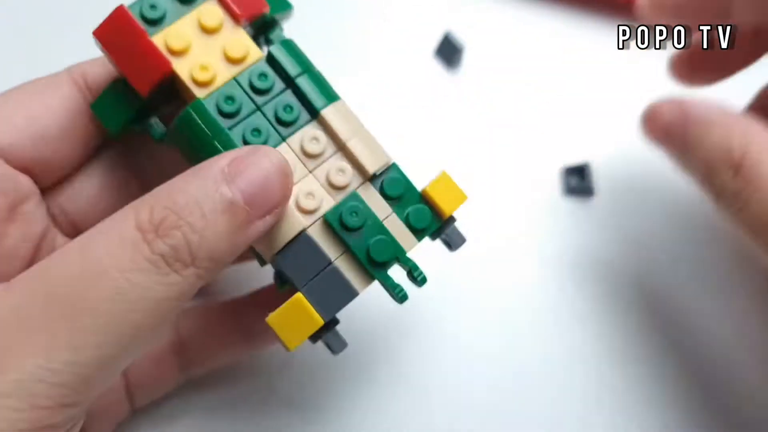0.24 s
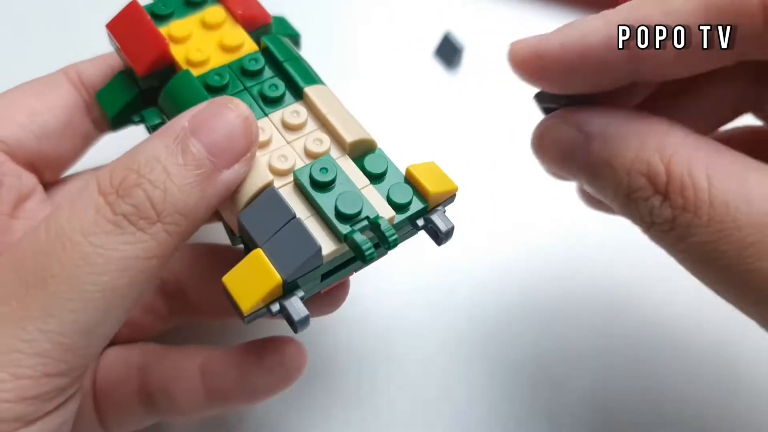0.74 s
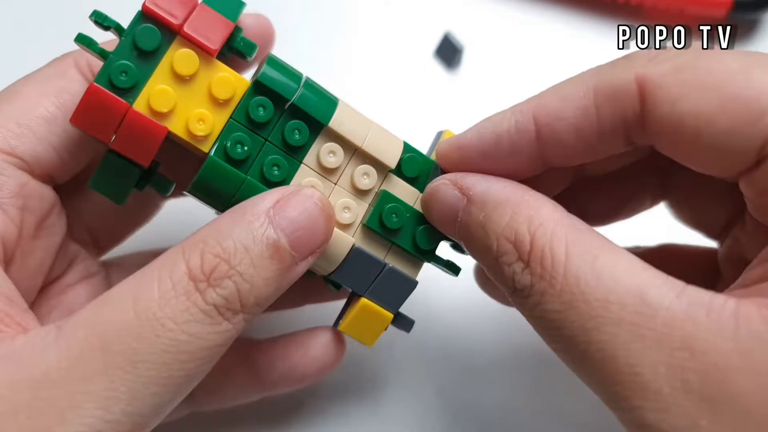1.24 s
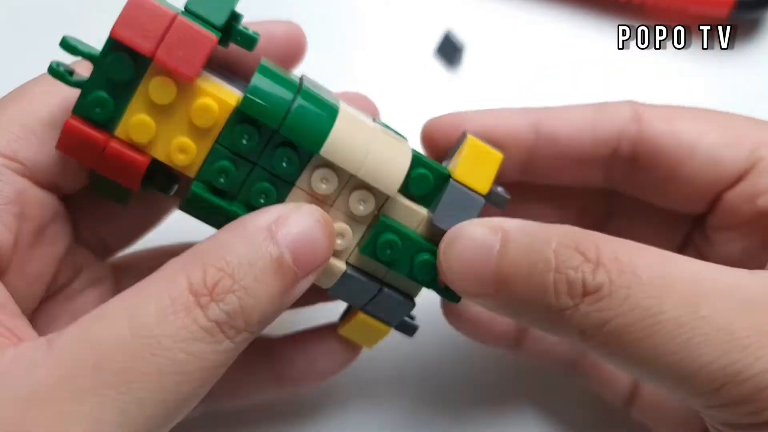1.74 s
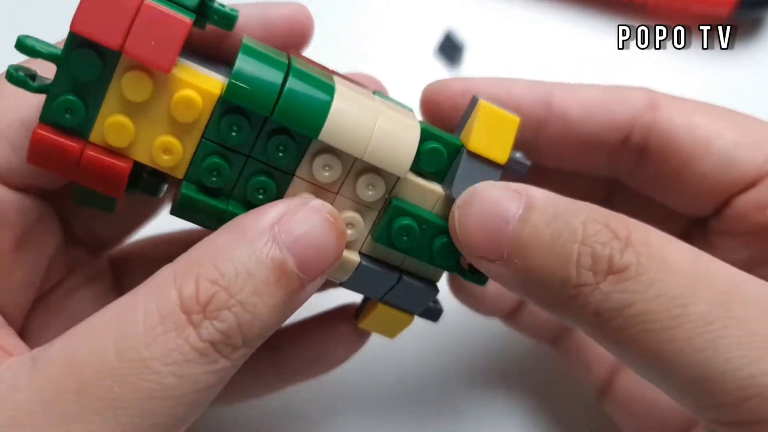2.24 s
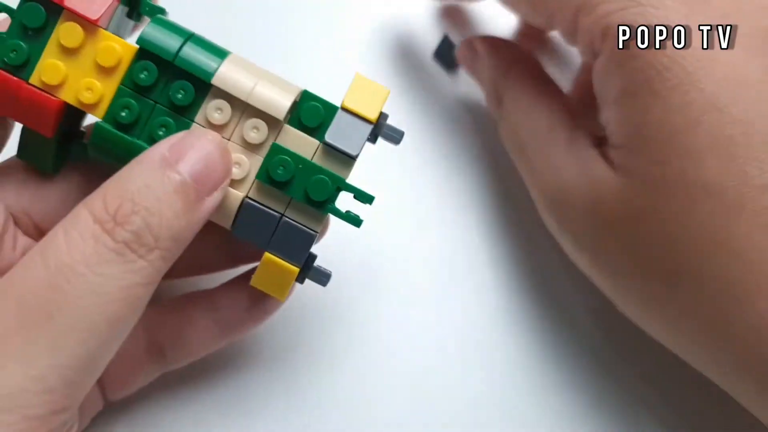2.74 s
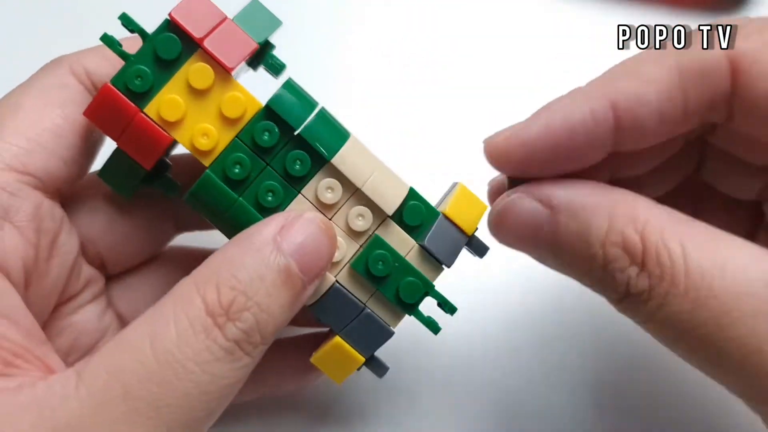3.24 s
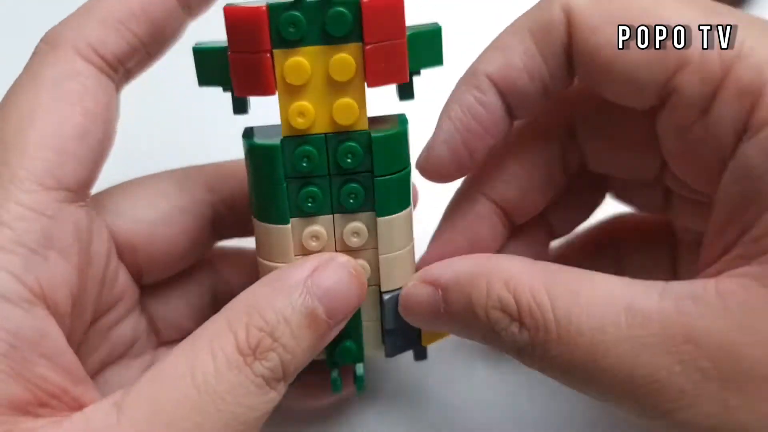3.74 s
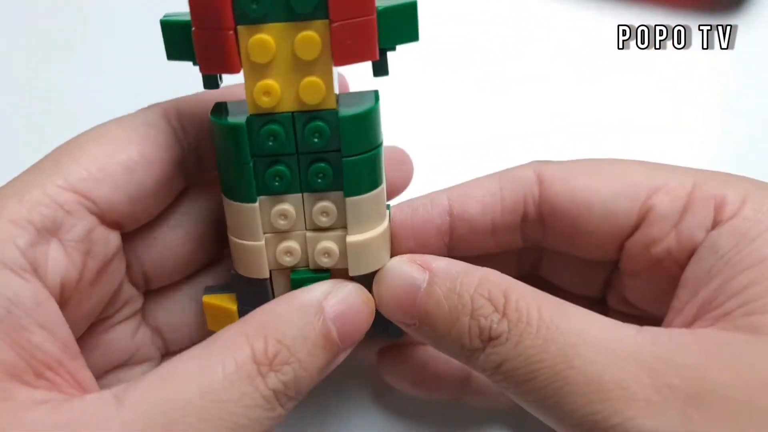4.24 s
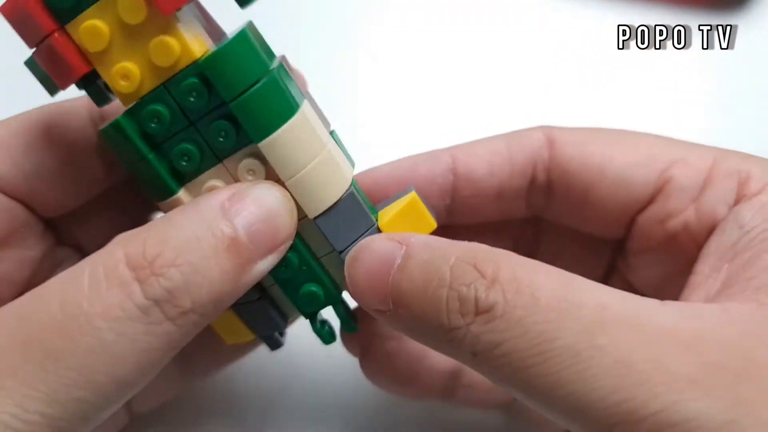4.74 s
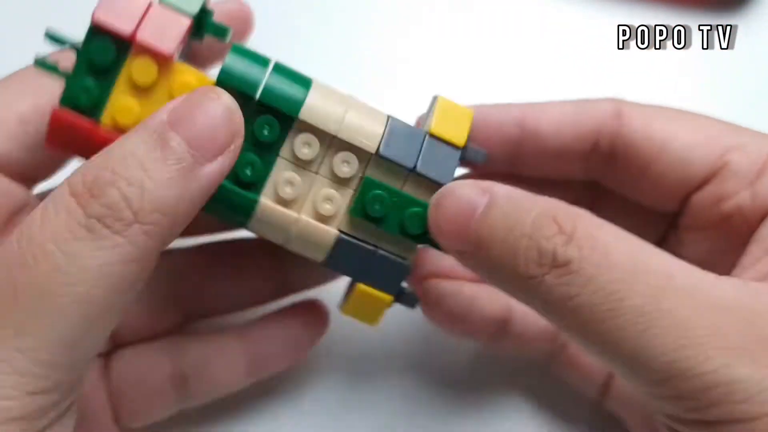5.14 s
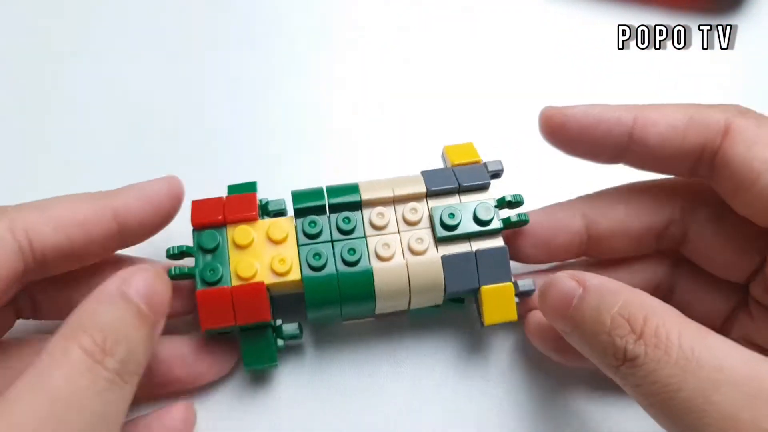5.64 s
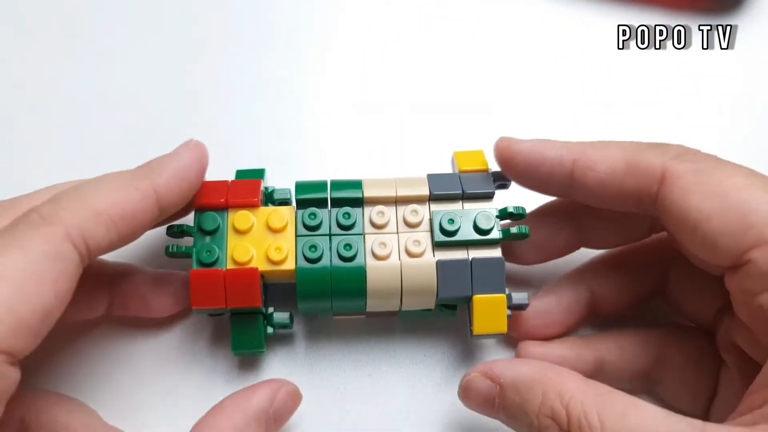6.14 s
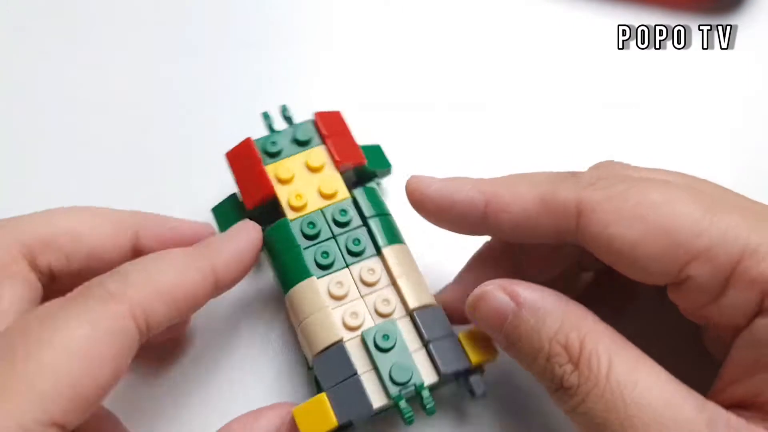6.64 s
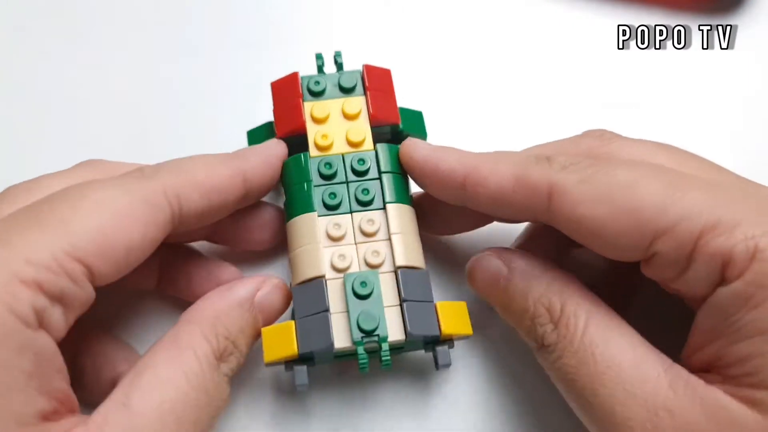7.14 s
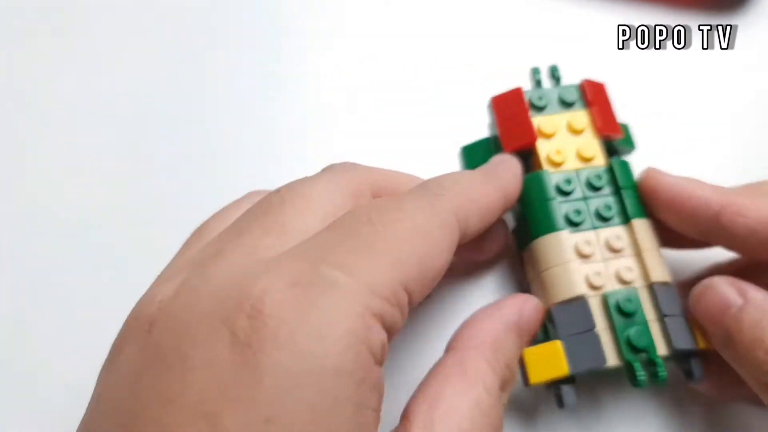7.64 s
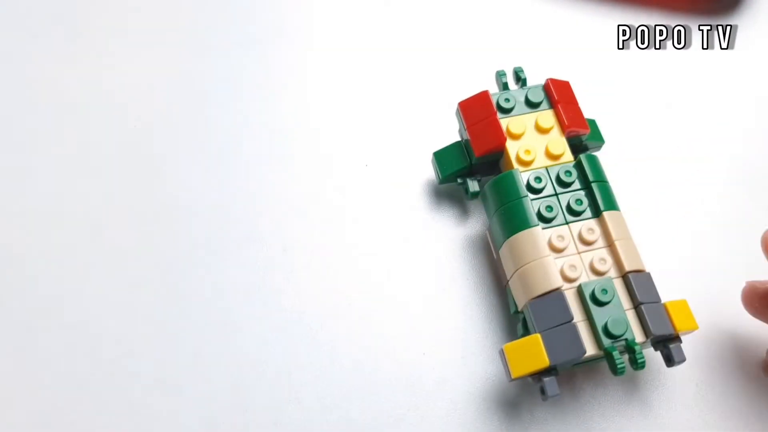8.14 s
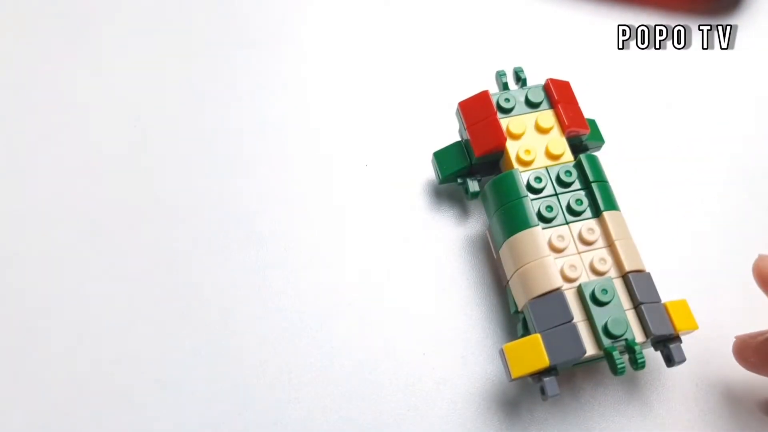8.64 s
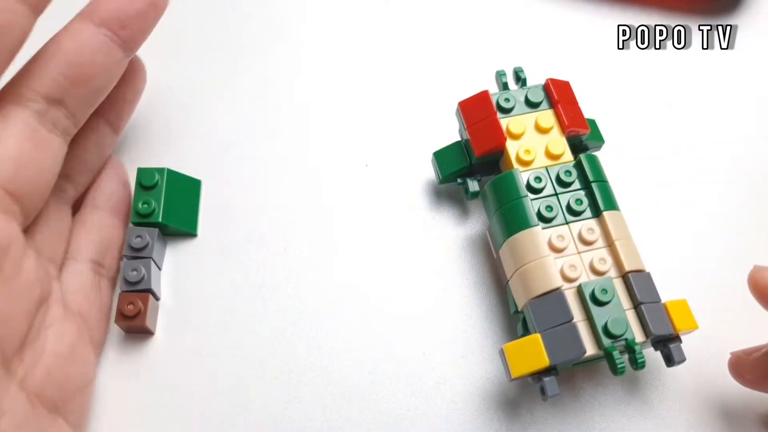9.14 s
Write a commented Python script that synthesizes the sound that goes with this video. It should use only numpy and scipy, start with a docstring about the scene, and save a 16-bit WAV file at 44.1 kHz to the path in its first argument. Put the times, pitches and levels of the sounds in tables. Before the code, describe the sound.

Sparse, bright clicks of small toy bricks being pressed together, each preceded by tiny creaking slips. One light ringing rattle of a loose piece comes between the snaps. Later come clustered woody knocks with plastic chatter as the finished section lands and is repositioned on a table, and finally a short uneven scrape with snags. Close and dry, with faint hand bumps mostly at left and a steady airy hum.

```python
"""Close by two microphones, hands work small plastic bricks onto a toy model: grazes, loud stud snaps, faint ticks,
each tick or snap after a creep of tiny slips. At 2.7 s a loose piece skitters, its modes ringing; from 5.3 to 7.8 s
the model's corners knock on the table in little bounces, and stick and slip as it is turned. From 8.4 s a part is
slid over the tabletop's catching grain. Throughout, hands rustle in fine grains on bricks and table, their low bumps
reach mainly the left microphone, and a fan hums as coloured noise; a diffuse tail makes the room small."""
import sys
import numpy as np
from scipy import signal
from scipy.fft import rfft, irfft, next_fast_len
from scipy.io import wavfile
from scipy.ndimage import uniform_filter1d, map_coordinates

SR = 44100
rng = np.random.default_rng(int(sys.argv[2]) if len(sys.argv) > 2 else 0)


def int16_out(signal):
    """Quantize to a 16-bit WAV file."""
    q = np.round(np.clip(np.atleast_2d(signal).T, -1, 1) * 32767)
    wavfile.write(sys.argv[1], SR, q.astype(np.int16))


N = 414981
TIME = np.arange(N) / SR
HIT = np.arange(SR // 4) / SR  # time inside one contact [s]
TOP_HZ = 15700  # the camera's band limit

# ringing modes of the brick walls: (pitch [Hz], level [dB], t60 [s])
WALL_MODES = [(2950, -2, 0.04), (4060, -4, 0.023), (4500, -11.5, 0.042), (5078, 3, 0.025), (6300, 1, 0.062),
              (6800, -1, 0.036), (8465, -1, 0.038)]
# push of a model's corner on the table: (frequency [Hz], level [dB])
THUD_SPECTRUM = [(40, -10), (150, -5.5), (400, 3), (700, 1), (1000, -7), (1300, -4), (2000, -15.5),
                 (3200, -49), (6000, -40.5), (16000, -59.5)]


def amp(db):
    """Decibels to gain."""
    return 10 ** (np.asarray(db) / 20)


def unit(x):
    """Scale to rms 1."""
    return x / np.sqrt(np.mean(x ** 2) + 1e-20)


def burst(x):
    """Scale each channel to the energy of 5 ms at rms 1."""
    return x / np.sqrt(np.sum(x ** 2, axis=-1, keepdims=True) / (.005 * SR))


def along(points, hz):
    """Interpolate (Hz, value) points on a log frequency axis."""
    f, v = np.transpose(points)
    return np.interp(np.log(hz + 1), np.log(f + 1), v)


def fade(t60):
    """Exponential decay of one contact, -60 dB after t60 seconds."""
    return np.exp(-np.log(1000) * HIT / t60)


def add(track, s, x):
    """Mix x into a stereo track at s seconds."""
    part = track[:, round(s * SR):][:, :x.shape[-1]]
    part += x[..., :part.shape[1]]


def pan(db):
    """Channel gains for a left-over-right level difference."""
    return amp([[db / 2], [-db / 2]])


def filtered(x, response):
    """x times a response of frequency."""
    m = next_fast_len(x.shape[-1] + 8192)  # padded, so that the ringing has room to die away
    spectrum = rfft(x, m) * response(np.fft.rfftfreq(m, 1 / SR))
    return irfft(spectrum, m)[..., :x.shape[-1]]


def resonance(f, hz, width):
    """Causal response of one mode."""
    return 1j * f * width / (hz * hz - f * f + 1j * f * width)


def below(f, hz):
    """Steep low-pass response."""
    return 1 / (1 + (f / hz) ** 8)


def wobble(rate):
    """A smooth random curve, rate knots a second."""
    knots = rng.standard_normal(int(N * rate / SR) + 4)
    return map_coordinates(knots, [TIME * rate])


def swells(rows):
    """Sum of smooth swells, one per (middle, length, level) row."""
    return sum(amp(db) * np.exp(-(2 * (TIME - s) / length) ** 2) for s, length, db in rows)


def noise(response, alike):
    """Stereo noise of rms 1 with a colour and a left-right likeness, set by its balance of mid and side."""
    def mid_and_side(f):
        angle = np.arccos(np.clip(along(alike, f), -1, 1)) / 2
        return response(f) * np.array([np.cos(angle), np.sin(angle)])
    mid, side = filtered(rng.standard_normal((2, N)), mid_and_side)
    return unit(np.array([mid + side, mid - side]))


def push(spectrum):
    """The most compact causal (minimum-phase) pulse with this spectrum."""
    n = len(HIT)
    cepstrum = irfft(np.log(amp(along(spectrum, np.fft.rfftfreq(n, 1 / SR)))), n)
    causal = 2 * cepstrum * (np.arange(n) < n // 2)
    return irfft(np.exp(rfft(causal)), n)


def crack(spectrum, t60):
    """A dying burst of tiny impacts, different at each microphone."""
    impacts = rng.standard_normal((2, len(HIT))) * fade(t60)
    return burst(signal.fftconvolve(impacts, push(spectrum)[None], axes=1)[:, :len(HIT)])


def catches(n, rate, size_db):
    """n samples of tiny impacts at random moments, rate a second, of uneven size."""
    struck = rng.random(n) < rate / SR  # the same moments at both microphones
    return struck * rng.choice([-1, 1], (2, n)) * amp(size_db * rng.uniform(-1, 1, (2, n)))


def ring(modes, spread, size=1):
    """Modes struck at new strengths; spread is their phase scatter between microphones, size lowers the pitch."""
    tone = 0
    for hz, db, t60 in modes:
        strength = amp(db + rng.normal(0, 2.8))
        phase = rng.uniform(0, 2 * np.pi) + spread * rng.standard_normal((2, 1))
        tone = tone + strength * fade(t60) * np.sin(2 * np.pi * hz / size * HIT + phase)
    return tone * (1 - np.exp(-HIT / 0.00027))


def body(x, modes):
    """x played through an object's modes, of alternating sign."""
    def response(f):
        return sum((-1) ** k * amp(db) * np.sqrt(t60) * resonance(f, hz, np.log(1000) / np.pi / t60)
                   for k, (hz, db, t60) in enumerate(modes))
    return filtered(x, response)


def click(hz, t60, edge_hz, ring_db):
    """A broad crack centred on a brick's pitch, with its main resonance, a neighbour and the modes round the stud."""
    # spectrum of the crack: (frequency [Hz], level [dB])
    brick_spectrum = [(300, -17.5), (1500, -18.5), (3000, -3), (6000, -1.5), (8500, 0.5), (10500, -3),
                      (14000, -9.5), (16000, -28.5)]
    # modes round a stud: (multiple of the brick's pitch, level [dB], t60 [s])
    stud_modes = [(.835, -11.5, .016), (1, -1, .014), (1.11, -9.5, .022), (1.48, -17.5, .02),
                  (1.63, -14, 0.025)]
    overtone, overtone_db, stud_db = 1.12, -7, -5.5  # neighbour's multiple of the pitch; levels in the ring
    quarter_turn = np.array([[1], [-1j]])  # the ring reaches the right microphone a quarter cycle late
    slip = crack(brick_spectrum, t60)
    slip = burst(filtered(slip, lambda f: resonance(f, hz, width=0.99 * hz) * below(f, edge_hz)))
    main = burst(filtered(slip[0], lambda f: resonance(f, hz, width=0.077 * hz) * quarter_turn))
    neighbour = filtered(slip[1], lambda f: resonance(f, overtone * hz, width=.025 * hz) * quarter_turn)
    stud = ring([(k * hz, level, decay) for k, level, decay in stud_modes], spread=0.1)
    stud = filtered(stud, lambda f: quarter_turn * below(f, edge_hz) * (1 - below(f, .5 * hz)))
    ringing = burst(main + amp(overtone_db) * burst(neighbour) + amp(stud_db) * burst(stud))
    return burst(amp(ring_db) * ringing + .85 * slip)


def plastic_clicks():
    """Tiny slips creep up to a snap or tick: a click, the brick's hollow, ringing walls and a thin top ring."""
    # plastic clicks, loud stud snaps, faint ticks and small slips after a snap: (time [s], level [dB],
    # main pitch [Hz], crack t60 [s], left over right [dB], hollow ring [dB], hollow pitch [Hz],
    # relative thin top ring [dB], creep before it [s], ring over the crack [dB])
    click_rows = [(0.971, -65.5, 6500, .03, 3, -2, 3860, -30, .0024, -3),
                  (0.9827, -46, 6600, .012, 8, -16, 3900, -33.5, .0032, -1.5),
                  (1.2294, -31, 6380, 0.016, 7, -4, 3590, 0, 0.0047, 2),
                  (1.257, -62.5, 6200, .032, 0, -11, 4100, -18, .008, -2.5),
                  (1.276, -61.5, 6300, 0.043, 0, -11, 3300, -25.5, .003, 12),
                  (1.721, -68, 6510, 0.065, 3, -24, 4030, -16, 0.0089, -3),
                  (1.913, -75, 6300, .06, 3.5, -20, 3980, -14, .008, 3),
                  (2.161, -65.5, 6070, 0.022, 9, -13, 2900, -28, .0075, 1),
                  (2.329, -64.5, 6000, .023, 1, -5, 2790, -26, .006, 1),
                  (2.828, -50.5, 4520, .04, 1, -3.5, 3520, -39, 0.018, 21),
                  (3.4364, -52.5, 7970, 0.015, 7, -4, 3570, -36, 0.0093, 8),
                  (3.51, -66, 7200, 0.025, 3, -8, 3730, -25, .01, -13),
                  (3.632, -55, 5620, .023, 4.5, -11.5, 4900, -13.5, 0.002, -2.5),
                  (3.6446, -20.5, 7930, 0.019, 2, -21, 4806, -14, .002, 2),
                  (3.6467, -38.5, 8700, .016, 5.5, -19.5, 2370, -12, .001, 0),
                  (4.0575, -40.5, 2050, 0.014, 8.5, -8.5, 1500, -23.5, .001, -9),
                  (4.0564, -30, 6714, 0.012, -1.5, -10, 3380, -17, 0.0023, -8),
                  (4.065, -42, 5970, 0.045, 1, -8, 2440, -22, .001, -14),
                  (4.069, -52, 8860, 0.087, 1, -19, 3300, -23, 0.0009, -17),
                  (4.195, -70, 6270, 0.045, -1, -9, 3900, -25, 0.0077, 3),
                  (4.264, -63.5, 6390, 0.047, 1.5, -8, 3520, -23, .008, 0),
                  (4.474, -66, 7020, 0.035, -1.5, -7, 3320, -21.5, 0.0072, 3),
                  (5.207, -62, 4460, .065, 6, -14, 4210, -32.5, 0.0069, -3),
                  (5.268, -57, 6900, .085, 0, -8, 3660, -17, .025, 3),
                  (5.340, -63, 5170, .06, -2, -6, 3270, -30.5, 0.0072, 0),
                  (6.427, -49, 6560, 0.054, -2, -22, 2900, -18, 0.012, 4),
                  (6.4478, -48, 3930, 0.064, 4.5, -10, 2710, -28, 0.0044, 8)]
    # a brick's underside: (multiple of its hollow pitch, level [dB], t60 [s])
    hollow_modes = [(.78, -16.5, .01), (1, 1, 0.02), (1.12, 0, 0.022), (1.38, -1, 0.017),
                    (1.52, -1.5, .022)]
    hollow_side_db = 5.5  # left over right
    creep_per_s, creep_db = 1000, -12  # rate of the tiny slips, and their energy under the click
    # harder clicks are brighter: upper edge at this level, and the rise in level that lifts it an octave
    edge_at_hz, edge_at_db, db_per_octave = 19000, -27.5, 49.5
    out = np.zeros((2, N))
    for s, db, hz, t60, side_db, hollow_db, hollow_hz, top_db, creep_s, ring_db in click_rows:
        release = click(hz, t60, edge_at_hz * 2 ** ((db - edge_at_db) / db_per_octave), ring_db)
        walls = amp(-22) * burst(ring(WALL_MODES, spread=1.2, size=np.exp(rng.normal(0, 0.15))))
        top = amp(top_db - 4.5) * burst(ring([(14200, 0, .014), (13600, -8.5, .012)], spread=0.6))
        hollow = ring([(k * hollow_hz, level, decay) for k, level, decay in hollow_modes], spread=0.2)
        hollow = burst(filtered(hollow, lambda f: 1 - below(f, .5 * hollow_hz)))
        bright = pan(side_db) * (release + walls + top)
        add(out, s, amp(db) * (bright + amp(hollow_db) * pan(hollow_side_db) * hollow))
        growth = (HIT < creep_s) * (0.36 + HIT / creep_s)
        slips = catches(len(HIT), creep_per_s, size_db=5.5)[0] * growth
        slips[0] = 0.34  # the creep always starts with one slip
        creep = signal.fftconvolve(release, slips[None], axes=1)[:, :len(HIT)]
        add(out, s - creep_s, amp(db + creep_db) * pan(side_db) * burst(creep))
    return out


def touches():
    """Brick grazes brick: a brief train of slips rings two resonances of the edge over a broad scuff."""
    # grazes: (time [s], length [s], level [dB], pitch [Hz], second pitch [Hz], its relative level [dB])
    touch_rows = [(.054, .008, -63.5, 4800, 5760, 0), (.066, .014, -66, 4620, 10900, -7),
                  (0.24, 0.015, -66.5, 4730, 4050, 2), (0.244, 0.011, -62, 7930, 8800, -15),
                  (1.912, .016, -76, 11200, 6200, -4), (2.506, 0.0073, -70, 6160, 3780, -8),
                  (2.822, .014, -55.5, 4500, 5300, -8), (2.845, 0.011, -67, 3840, 3200, -7),
                  (6.521, 0.0073, -66, 5780, 3870, -4)]
    half_width_hz = 400  # of each resonance, to its -6 dB points
    slips_per_s, release_s = 1300, .04
    scuff_db, scuff_edge_hz = -8, 9500  # a graze's scuff has little above this edge
    out = np.zeros((2, N))
    for s, length, db, hz, second_hz, second_db in touch_rows:
        release = np.exp(-np.log(1000) * np.maximum(HIT - length, 0) / release_s)
        pressure = np.clip(0.42 + HIT / length, 0, 1) * release
        slips = pressure * catches(len(HIT), slips_per_s, size_db=3)
        first = burst(filtered(slips, lambda f: resonance(f, hz, 2 * half_width_hz) ** 2))
        second = burst(filtered(slips, lambda f: resonance(f, second_hz, 2 * half_width_hz) ** 2))
        scuff = burst(filtered(slips, lambda f: resonance(f, hz, hz) * below(f, scuff_edge_hz)))
        add(out, s, amp(db) * pan(2.2) * (first + amp(second_db) * second + amp(scuff_db) * scuff))
    return out


def skitter():
    """A loose piece skips under the fingertips: each skip rings it and rattles its edge on the table."""
    # skips: (time [s], level [dB], relative edge rattle [dB])
    skip_rows = [(2.6522, -38, -0.5), (2.6578, -32.5, -3), (2.667, -32, -2.5), (2.6703, -38.5, 0),
                 (2.6737, -41, -0.5)]
    # modes of the loose piece: (pitch [Hz], level [dB], t60 [s])
    piece_modes = [(1320, -6, 0.033), (1540, 0, 0.05), (1835, 7.5, 0.044), (2170, -22, 0.02),
                   (2674, -2.5, 0.037), (3580, -18, .03), (5550, -9, 0.029), (7040, -9, 0.073),
                   (11150, -29, 0.056)]
    # rattle of its edge: (frequency [Hz], level [dB])
    edge_spectrum = [(120, -3), (450, 7.5), (900, -8), (1500, -1.5), (3000, -1.5), (4200, -6), (6000, -3),
                     (8000, -9), (10000, -22), (13500, -28.5), (15500, -40.5)]
    out = np.zeros((2, N))
    for s, db, edge_db in skip_rows:
        rattle = amp(edge_db) * crack(edge_spectrum, t60=0.088)
        add(out, s, amp(db) * (burst(ring(piece_modes, spread=0.22)) + rattle))
    return out


def judder(t60):
    """A corner trembling against the table: dying impacts with a soft start."""
    return crack(THUD_SPECTRUM, t60)[0] * (1 - np.exp(-HIT / 0.003))


def board(x, hz, width):
    """The tabletop's answer; the place of contact decides which modes answer most."""
    # modes of the tabletop: (pitch [Hz], level [dB], t60 [s])
    table_modes = [(158, 11.5, 0.063), (350, 7.5, 0.073), (388, 1.5, 0.18), (460, 2, 0.038),
                   (626, -6.5, 0.046), (691.6, 1, 0.066), (877, -6.5, 0.065), (1070, -7, 0.027),
                   (1220, 2.5, 0.037), (1520, -11, 0.055)]
    return filtered(body(x, table_modes), lambda f: resonance(f, hz, width) ** 2)


def knocks(count=4):
    """Each landing corner pushes the table and bounces at even, weakening steps; board shudders, bricks chatter."""
    # landings: (time [s], peak of the push [dB], loss a bounce [dB], relative rattle of the bricks [dB],
    # relative ring of the tabletop [dB], favoured pitch [Hz])
    knock_rows = [(5.3533, -26.5, 5, -18.5, -22, 500), (5.360, -35, 19, -6.5, -14, 600),
                  (5.4895, -28.5, 8, -21, -16, 493), (5.497, -22, 5.5, -15, -6.5, 610),
                  (6.4488, -32, 20, -17.5, -8.5, 1150), (6.5068, -29.5, 17.5, -22, -11, 1100),
                  (6.653, -24, 17.5, -19, -20, 605), (6.6596, -15, 10, -21.5, -21, 800),
                  (6.6649, -15.5, 5, -16.5, -15, 846), (6.679, -20.5, 6, -17.5, -15.5, 654),
                  (6.689, -20, 4.5, -36, -16, 680), (6.993, -33.5, 12, -25, -21, 880),
                  (7.289, -9, 15, -18, -22, 1350), (7.2948, -25.5, 13, -5, -15, 1390),
                  (7.611, -43.5, 16, -28, -10.5, 1100), (7.755, -43, 19, -33.5, -10.5, 1245)]
    # rattle of the model's bricks: (frequency [Hz], level [dB])
    rattle_spectrum = [(300, 17), (1200, 8), (2900, 12), (4200, -1.5), (7300, 0.5), (9000, -16),
                       (11500, -10.5), (15500, -47)]
    bounce_s, rattle_loss = .0057, 0.92  # time between bounces; share of each bounce's loss that the rattle takes
    board_t60_s, focus = 0.036, 1.1  # trembling that drives the board; width of its answer over the pitch
    # harder landings rattle brighter: upper edge at this peak, and the rise in peak that lifts it an octave
    bright_hz, bright_at_db, db_per_octave = 10100, -28, 50
    out = np.zeros((2, N))
    pulse = -push(THUD_SPECTRUM)
    pulse = pulse / np.abs(pulse).max()
    for s, db, loss_db, rattle_db, board_db, hz in knock_rows:
        add(out, s, amp(db + board_db) * burst(board(judder(board_t60_s), hz, focus * hz)))
        edge_hz = bright_hz * 2 ** ((db - bright_at_db) / db_per_octave)
        for k in range(count):
            shudder = crack(THUD_SPECTRUM, t60=0.022)
            shudder = amp(-19.0) * shudder[0] + amp(-18.5) * shudder[::-1]  # mostly alike at both microphones
            walls = burst(ring(WALL_MODES, spread=1.44, size=np.exp(rng.normal(0, 0.0528))))
            chatter = crack(rattle_spectrum, t60=0.047) + amp(-12.5) * walls
            chatter = amp(rattle_db - k * rattle_loss * loss_db) * filtered(chatter, lambda f: below(f, edge_hz))
            contact = amp(-k * loss_db) * (pulse + shudder) + chatter
            add(out, s + k * bounce_s, amp(db) * contact)
    return out


def stick_slip(length, rate, count=64):
    """A dragged corner sticks and slips at a nearly even rate."""
    scatter_share, size_db = 0.08, 3.5  # unevenness: timing as a share of one slip, and size
    attack_s, release_s = 0.0015, 0.056
    scatter, size = rng.standard_normal((2, count))
    s = np.abs(np.arange(count) + scatter_share * scatter) / rate
    release = np.exp(-np.log(1000) * np.maximum(s - length, 0) / release_s)
    grip = (1 - np.exp(-s / attack_s)) * release
    return np.bincount(np.round(s * SR).astype(int), grip * amp(size_db * size), len(HIT))[:len(HIT)]


def rocks():
    """The model judders over the tabletop as it is turned: trains of slips ring the board."""
    # judders: (time [s], length before the release [s], level [dB], slips a second [1/s],
    # favoured pitch [Hz], its width to -6 dB [Hz])
    rock_rows = [(5.517, 0.027, -46.5, 170, 383, 506), (5.542, 0.034, -54, 120, 596, 1500),
                 (6.326, 0.018, -41, 350, 600, 700), (6.357, 0.0067, -49, 383, 740, 450),
                 (6.388, 0.097, -57, 350, 702, 400), (6.442, 0.0072, -54, 440, 1150, 800),
                 (6.474, 0.026, -46, 350, 650, 480), (6.534, 0.013, -37, 350, 620, 700),
                 (6.605, 0.0091, -40, 345, 520, 450), (6.972, 0.017, -48.5, 450, 880, 232),
                 (7.03, 0.033, -60.5, 250, 765, 300)]
    out = np.zeros((2, N))
    for s, length, db, rate, hz, width in rock_rows:
        drag = board(stick_slip(length, rate), hz, width)
        add(out, s, amp(db) * drag * np.sqrt(length * SR) / np.linalg.norm(drag))
    return out


def model_on_table():
    """Knocks and judders of the model, which reach the left microphone 0.13 ms before the right."""
    delay_s = np.array([[0], [.00013]])
    return filtered(knocks() + rocks(), lambda f: np.exp(-2j * np.pi * f * delay_s)) * pan(-0.12)


def effort(s, db, attack, hold, release):
    """One push: it builds, sags while held and lets go."""
    sag_db_per_s = 23
    t = TIME - s
    held, released = np.clip(t - attack, 0, hold), np.maximum(t - attack - hold, 0)
    return amp(db - sag_db_per_s * held) * np.clip(t / attack, 0, 1) * np.exp(-np.log(1000) * released / release)


def shifting(x):
    """The contact changes along the way: patches of colour come and go, and the edge's rasp glides."""
    # the sliding edge's rasp: (time [s], pitch [Hz])
    rasp_path = [(8.4, 2660), (8.55, 3030), (8.65, 2570), (8.7, 2700), (8.79, 2670), (8.84, 3110),
                 (8.97, 3020)]
    rasp_width_hz, rasp_db, patchy_db = 800, 4.5, 4
    hz, t, z = signal.stft(x, SR, nperseg=256)
    patches = uniform_filter1d(rng.standard_normal(z.shape[1:]), size=3, axis=0)  # over frequency
    patches = unit(uniform_filter1d(patches, size=9, axis=1))  # over time
    rasp_hz = np.interp(t, *np.transpose(rasp_path))
    rasp = np.exp(-(2 * (hz[:, None] - rasp_hz) / rasp_width_hz) ** 2)
    coloured = z * amp(patchy_db * patches + rasp_db * rasp)
    return unit(signal.istft(coloured, SR, nperseg=256)[1][:, :N])


def slide():
    """Plastic catches on the table's fine grain; the part's modes flare, its edge whistles, and snags jerk it."""
    # pushes: (time [s], relative level [dB], attack [s], hold [s], release to -60 dB [s], ring of the part [dB])
    push_rows = [(8.387, -50.5, 0.017, 0.013, 0.5, -7), (8.484, -47.5, 0.047, 0.19, 0.6, -1),
                 (8.628, -42, 0.025, 0.26, 0.19, 0.5), (8.952, -54, 0.0056, 0.018, 0.16, 12.5)]
    # colour of the scrape: (frequency [Hz], level [dB])
    scrape_spectrum = [(300, -16), (800, -4.5), (1800, -3.5), (3000, 1), (3900, 1.5), (5200, 1), (6800, -4),
                       (8200, -9.5), (10000, -24), (12000, -34), (14000, -40.5), (15000, -52)]
    # modes of the sliding part: (pitch [Hz], width to -6 dB [Hz], relative level [dB])
    part_modes = [(1830, 770, -20.5), (2306, 86, -17.5), (3020, 600, -17), (5000, 710, -16),
                  (7360, 390, -6.5), (11300, 650, -25.5), (12100, 300, -36)]
    # the edge's thin whistle: (time [s], mean level [dB])
    whistle_path = [(8.5, -90), (8.57, -73), (8.66, -85), (8.72, -62), (8.83, -69), (8.88, -94)]
    # snags: (time [s], level [dB], pitch [Hz])
    snag_rows = [(8.399, -50, 3000), (8.4087, -50, 4400), (8.512, -60, 3500), (8.521, -46, 3600),
                 (8.5684, -48, 4700), (8.6098, -45, 3500), (8.6562, -41, 2200), (8.662, -41, 2700),
                 (8.734, -43, 3600), (8.776, -45, 3580), (8.848, -53, 3200), (8.8712, -64, 4000),
                 (8.9096, -43.5, 4500), (8.918, -42.5, 3050), (8.925, -50, 7300), (8.9594, -51.5, 3980)]
    catches_per_s, catch_size_db = 880, 8.5  # the table's grain: rate, spread of sizes
    flare = 1.6  # the higher a mode, the more steeply it grows with the push
    whistle_hz, whistle_width_hz = 13860, 410
    snag_t60_s, snag_slips_per_s = 0.056, 1500  # a snag is a short flurry of catches
    force = np.max([effort(*row) for *row, _ in push_rows], axis=0)
    ringing = np.max([amp(ring_db) * effort(*row) for *row, ring_db in push_rows], axis=0)
    scrape = noise(lambda f: amp(along(scrape_spectrum, f)), [(1000, 0.1), (3000, 0.26), (7000, 0.048)])
    grit = catches(N, catches_per_s, catch_size_db)
    grit = unit(signal.fftconvolve(grit, push(scrape_spectrum)[None], axes=1)[:, :N])
    walls = 0
    for hz, width, db in part_modes:
        mode = unit(amp(4.0 * wobble(45)) * filtered(scrape, lambda f: resonance(f, hz, width) ** 2))
        walls = walls + amp(db) * (force / force.max()) ** (flare * hz / TOP_HZ) * mode
    whistle_db = np.interp(TIME, *np.transpose(whistle_path), left=-np.inf, right=-np.inf)
    whistle = unit(filtered(scrape, lambda f: resonance(f, whistle_hz, whistle_width_hz) ** 2))
    whistle = amp(whistle_db + 2.5 * wobble(40)) * whistle
    rubbing = force * amp(-2.0 + 1.15 * wobble(200)) * shifting(grit + amp(3.5) * scrape)
    out = rubbing * pan(1.7) + (ringing * walls + whistle) * pan(7.0)
    for s, db, hz in snag_rows:
        flurry = catches(len(HIT), snag_slips_per_s, size_db=3) * fade(snag_t60_s)
        flurry = signal.fftconvolve(flurry, push(scrape_spectrum)[None], axes=1)
        flurry = burst(filtered(flurry, lambda f: resonance(f, hz, width=1.1 * hz)))
        add(out, s, amp(db) * pan(1.8) * flurry)
    return out


def rustles():
    """Soft rustles of hands on bricks and table, some faint and breath-like: coloured grains through wall modes."""
    # rustles: (middle [s], length [s], level before a 4.5 dB cut [dB], main pitch [Hz])
    rustle_rows = [(1.093, 0.047, -68.5, 7500), (1.179, 0.036, -69.5, 6200), (1.429, 0.045, -69, 2900),
                   (2.512, .07, -65.5, 3960), (2.588, 0.12, -68, 3100), (2.649, 0.032, -56, 4560),
                   (2.775, 0.087, -68, 3400), (2.823, 0.046, -61, 4570), (2.94, 0.13, -66, 6000),
                   (3.7, .07, -68, 7500), (3.962, 0.037, -71, 6860), (4.76, .3, -73.5, 3000),
                   (5.248, 0.14, -65.5, 5830), (5.415, 0.12, -67, 3780), (5.997, 0.28, -72, 2960),
                   (6.438, 0.036, -52, 5000), (6.347, 0.066, -65.5, 4000), (6.496, 0.083, -61, 4000),
                   (6.546, 0.048, -61, 3480), (7.061, 0.17, -65, 3570), (7.182, 0.046, -62.5, 5760),
                   (7.454, 0.11, -64, 5840), (7.848, .1, -65.5, 5820), (8.042, 0.059, -62, 5570),
                   (8.238, 0.3, -66, 3740), (8.2, 0.096, -74.5, 13000), (9.052, 0.027, -66, 4460),
                   (9.27, 0.25, -69, 6040)]
    # colour of a rustle: (frequency [Hz], level [dB])
    rustle_spectrum = [(800, 19.5), (3000, 5.5), (6000, -5), (9000, -8), (14000, -12.5), (16000, -30)]
    width_share, catches_per_s = 0.63, 600  # width of the colour over its pitch; rate of the fine grains
    out = np.zeros((2, N))
    t = np.arange(SR) / SR - .5
    for s, length, db, hz in rustle_rows:
        grains = unit(catches(SR, catches_per_s, size_db=2.0)) + amp(-2.5) * rng.standard_normal((2, SR))
        colour = lambda f: amp(along(rustle_spectrum, f)) * resonance(f, hz, width_share * hz)
        rustle = unit(filtered(grains, colour))
        swell = amp(db - 4.5) * np.exp(-(2 * t / length) ** 2)
        add(out, s - .5, swell * (rustle + amp(-4) * unit(body(rustle, WALL_MODES))))
    return out


def hands():
    """Slow bumps of the hands, as low noise, reach mainly the left microphone."""
    # the hands shift their grip: (middle [s], length [s], level before the microphone gains [dB])
    grip_rows = [(.12, 0.22, -54), (.85, 0.32, -48), (1.29, 0.082, -49), (1.835, 0.017, -43.5),
                 (2.083, 0.035, -43.5), (2.85, 0.082, -44), (3.91, 0.098, -43.5), (4.12, 0.14, -49),
                 (4.57, 0.26, -50.5), (5.31, 0.05, -36), (5.91, 0.11, -44), (6.84, 0.16, -40.5),
                 (8.14, 0.073, -46), (8.52, 0.073, -44.5), (8.92, 0.15, -51.5), (9.23, 0.045, -51.5)]
    # low bumps: (frequency [Hz], level [dB])
    rumble_spectrum = [(12, -7), (30, -2), (55, 4), (90, -2), (130, -13.5), (250, -42.5), (1000, -78)]
    # small unsteady movements throughout: level before the microphone gains, its swing, and knots a second
    fidget_db, fidget_swing_db, fidget_per_s = -64, 2.5, 15
    fidget = amp(fidget_db + fidget_swing_db * wobble(fidget_per_s))
    movement = np.hypot(swells(grip_rows), fidget)
    bumps = movement * noise(lambda f: amp(along(rumble_spectrum, f)), [(50, 0.85)])
    return bumps * amp([[5], [-18]])  # left and right microphone gains


def fan():
    """Steady air noise with a few narrow, fuzzy tones, each a band of noise."""
    # air: (frequency [Hz], level [dB])
    air_spectrum = [(20, -7.5), (110, -8), (180, 2.5), (260, -0.5), (380, 0.5), (500, -6.5), (700, -16.5),
                    (1000, -17.5), (1700, -20), (3000, -32.5), (4800, -45), (8000, -41), (9800, -47.5),
                    (15500, -52)]
    # fan tones and a thin hiss: (pitch [Hz], half-width to -6 dB [Hz], level [dB])
    hum_bands = [(189.3, 11, -60.5), (336.1, 6.5, -60.5), (8045, 430, -90.5)]
    # likeness at the two microphones: (frequency [Hz], correlation [-1 to 1])
    likeness = [(50, 1), (120, 0.7), (190, 1), (350, 0.86), (550, 0.19), (1650, 0.043), (4970, 0.071),
                (15000, -0.51)]
    out = amp(-53.0) * noise(lambda f: amp(along(air_spectrum, f)), likeness)
    for hz, half_width, db in hum_bands:
        out = out + amp(db) * noise(lambda f: resonance(f, hz, 2 * half_width) ** 2, likeness)
    return out


def room(x):
    """A short diffuse tail of fading noise, 5 ms after the direct sound."""
    # decay of the small room: (frequency [Hz], t60 [s])
    room_decay = [(200, 0.27), (1500, 0.14), (7000, 0.1), (14000, 0.08)]
    hz, t, z = signal.stft(rng.standard_normal((2, SR // 3)), SR, nperseg=256)
    decay = np.exp(-np.log(1000) * t / along(room_decay, hz)[:, None])
    tail = signal.istft(z * decay, SR, nperseg=256)[1]
    tail = np.pad(tail / np.linalg.norm(tail[0]), ((0, 0), (SR // 200, 0)))
    return signal.fftconvolve(x, tail, axes=1)[:, :N]


def scene():
    """Plastic sounds with the room's tail, over the rustles, the hands and the fan."""
    plastic = plastic_clicks() + touches() + skitter() + model_on_table() + slide()
    return plastic + amp(-24.5) * room(plastic) + rustles() + hands() + fan()


def record(dry):
    """The camera keeps nothing above its band limit."""
    return filtered(dry, lambda hz: hz < TOP_HZ)


dry = scene()
out = record(dry)
int16_out(out)
```